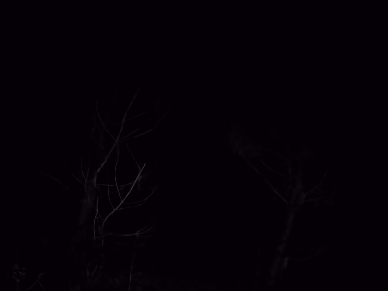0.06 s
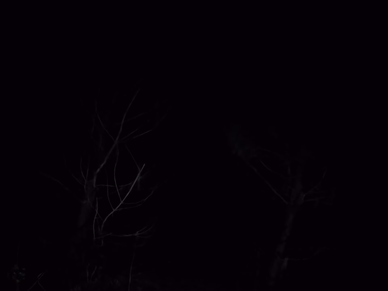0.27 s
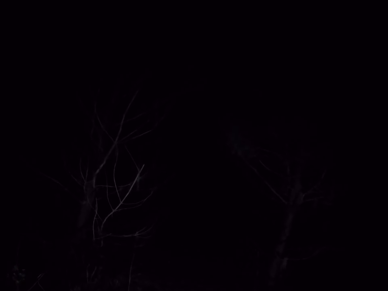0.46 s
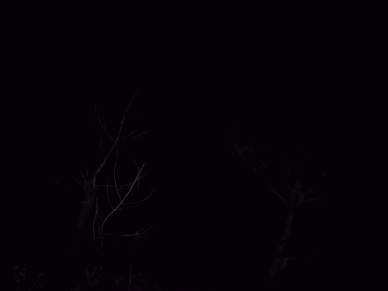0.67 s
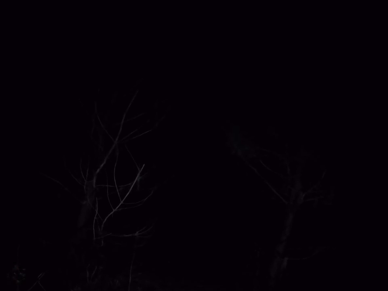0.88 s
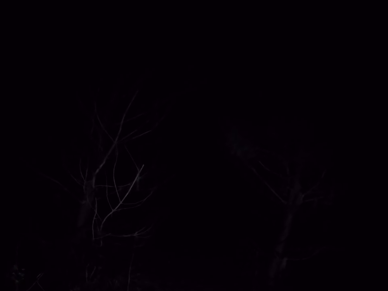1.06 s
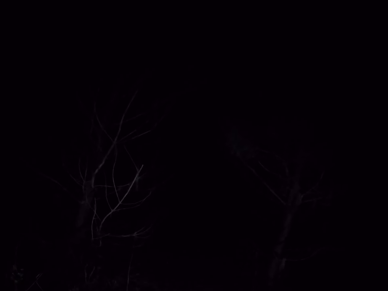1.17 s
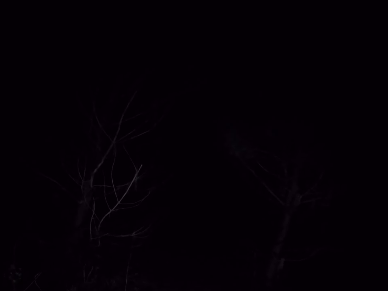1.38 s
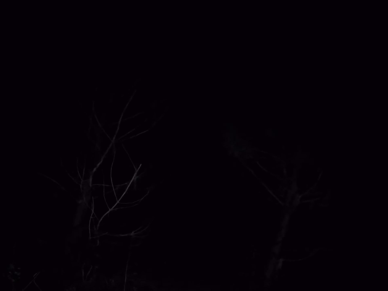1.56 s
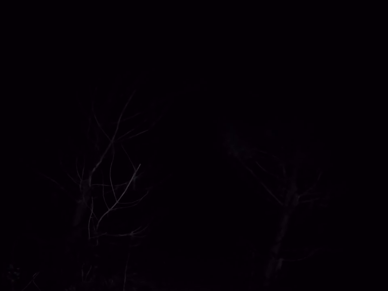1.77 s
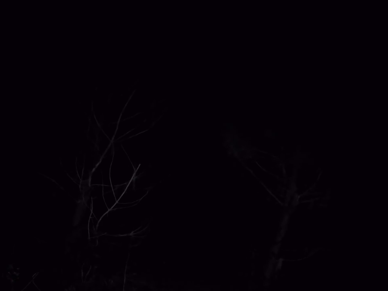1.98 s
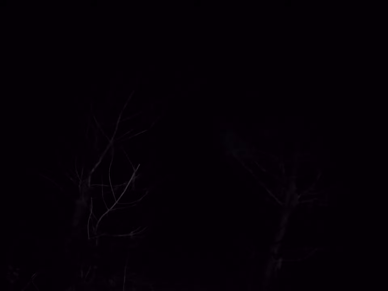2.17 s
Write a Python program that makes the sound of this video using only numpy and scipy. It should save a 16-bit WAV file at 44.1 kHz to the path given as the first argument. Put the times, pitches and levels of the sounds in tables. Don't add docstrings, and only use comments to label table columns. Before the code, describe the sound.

Hounds barking and baying in night woods, two hoarse chops answered by clear howls, crickets trilling

```python
import sys
import numpy as np
from scipy import signal
from scipy.fft import rfft, irfft, next_fast_len
from scipy.io import wavfile
from scipy.ndimage import uniform_filter1d, map_coordinates

SR = 44100
rng = np.random.default_rng(int(sys.argv[2]) if len(sys.argv) > 2 else 0)


def wrap_up_sound(samples):
    columns = np.atleast_2d(samples).T
    tamed = np.clip(columns, -1, 1)
    steps = np.round(tamed * 32767).astype(np.int16)
    wavfile.write(sys.argv[1], SR, steps)


def to_linear_factor(level_db):
    exponent = np.asarray(level_db, float) / 20
    return 10 ** exponent


N = 97020
T = np.arange(N) / SR

# time in seconds, pitch in Hz, level in dB,
# roughness from 0 to 1, strength of the odd multiples of the pitch from 0 (an octave up) to 1.
BARKS = [
    [(.206, 322, -70, 0.1, 1), (.22, 326.6, -46.5, 0, 1), (.236, 330.4, -36.5, 0.37, 1),
     (.248, 376.7, -38.5, 0.2, 0), (.272, 377.5, -39, 0.37, 0.54), (.285, 417.4, -38, 0.45, .25),
     (.305, 393.8, -41, 0.6, 1), (.315, 314.4, -37.5, 0.48, 0.9), (.39, 303, -63, .8, 0)],
    [(.919, 342, -50, .05, 1), (.934, 322, -49, 0.05, 1), (.942, 339, -40, 0.15, 0.9),
     (.962, 350, -36, 0.35, 0.7), (.978, 363, -37, 0.3, .3), (1, 364, -41, 0.35, 0.3),
     (1.014, 385, -41, 0.4, .3), (1.03, 325, -39, 0.3, 0.3), (1.045, 320, -52, .6, .3),
     (1.09, 300, -75, 0.7, 0.14)],
]
# time in seconds, pitch in Hz, level in dB, roughness from 0 to 1.
FAR_BARKS = [
    [(.466, 328, -58, 0.1), (.476, 330, -45, 0.09), (.53, 339.3, -49, 0.5), (.585, 335.4, -46, 0.5),
     (.615, 668, -42, 0.1), (.645, 655, -50, 0.15), (.665, 655, -43, 0.1), (.69, 648, -62, 0.1)],
    [(1.07, 368.3, -68, 0.41), (1.1, 373.3, -49, 0.4), (1.17, 354, -48, 0.5), (1.21, 618, -52, .12),
     (1.3, 604, -60, 0.3), (1.36, 600, -72, 0.3)],
]
# time in seconds, pitch in Hz, level in dB.
BAYS = [
    [(.462, 672, -63), (.484, 672, -45), (.522, 673, -34), (.534, 676, -44), (.556, 664, -43),
     (.572, 673, -31), (.6, 676, -44), (.626, 672, -37), (.642, 672, -50), (.664, 674, -54),
     (.678, 682, -47), (.695, 680, -62)],
    [(1.1, 630, -50), (1.114, 632, -41), (1.142, 700, -38), (1.155, 716, -45), (1.185, 727, -40),
     (1.23, 726, -41), (1.252, 727, -49), (1.264, 727, -39), (1.304, 726, -43), (1.322, 727, -54),
     (1.336, 727, -48), (1.39, 720, -55), (1.42, 718, -66), (1.46, 717, -60), (1.51, 724, -69),
     (1.69, 720, -70)],
    [(1.13, 652, -48), (1.155, 660, -48), (1.178, 671, -37), (1.2, 672, -44), (1.225, 668, -50),
     (1.27, 665, -47), (1.36, 660, -60)],
    [(.73, 690, -66), (.748, 692, -50), (.77, 690, -64), (.805, 690, -54), (.824, 688, -66),
     (.84, 687, -56), (.866, 686, -68), (.885, 685, -59), (.94, 682, -64)],
    [(.8, 632, -72), (.83, 628, -66), (.87, 622, -63), (.89, 620, -72)],
    [(.525, 700, -56), (.542, 706, -41), (.56, 708, -52), (.59, 712, -42), (.61, 705, -44), (.65, 700, -52),
     (.67, 700, -62)],
    [(.255, 800, -56), (.28, 838, -45), (.31, 835, -50), (.33, 830, -60)],
    [(.968, 815, -56), (.98, 832, -44), (1.015, 836, -44), (1.03, 830, -60)],
]
BAY_OVERTONES = [
    [0, -26],
    [0, -11, -24, -36],
    [0, -28],
    [0, -22],
    [-9, 0],
    [0, -22],
    [0, -6],
    [0, -14],
]
# frequency in Hz, level in dB.
THROAT = [(310, -64), (520, -17), (583, -5.5), (725, -6.5), (1080, -6.5), (1460, 2.5), (1910, -5),
          (2710, -7), (4200, -26.5), (5460, -52), (9240, -120)]
# frequency in Hz, level in dB.
FAR_THROAT = [(550, 1.5), (950, 2), (1360, 6.5), (1700, 8), (1980, -6), (2300, 2.5), (4200, -29)]
# frequency in Hz, level in dB.
CLOSED_MOUTH = [(600, -5), (980, 9), (1250, 0), (2000, -45), (5000, -88)]
# frequency in Hz, level in dB.
HALF_OPEN_MOUTHS = [
    [(600, -25), (980, -11), (1300, -12), (1640, -1.5), (2300, -14), (3100, -24), (5000, -65)],
    [(600, -30), (980, -20), (1400, -8), (1700, -7), (2250, 1), (3100, -12), (5000, -65)],
]
# time it opens in seconds, time it stands wide in seconds.
MOUTH_TIMES = [(.216, .238), (.937, .98)]
# frequency in Hz, time to die by 60 dB in seconds.
WOODS = [(500, 0.79), (1500, 0.49), (4000, 0.33)]
# start in seconds, length in seconds, level in dB.
NEAR_CHIRPS = [(-.01, 0.15, -54.5), (.27, 0.17, -59), (.54, 0.21, -54), (.885, 0.11, -55),
               (1.15, 0.14, -57), (1.415, 0.2, -56), (1.695, 0.22, -56.5), (1.995, 0.26, -58.5)]
# start in seconds, length in seconds, level in dB.
LOW_CHIRPS = [(.26, 0.14, -64), (.58, 0.14, -63), (.85, 0.17, -63), (1.18, .12, -65), (1.47, .13, -60),
              (1.77, 0.13, -57.5), (2.06, 0.2, -62)]
# pitch in Hz, strokes a second, share sounding, level in dB, first stroke in seconds.
TRILLS = [
    (3674, 54, 0.78, -65, .01),
    (2146, 100, 0.8, -69.5, 0.011),
    (7110, 53, 1, -70, 0.013),
]
# pitch in Hz, strokes a second, share sounding, level in dB, first stroke in seconds.
TICKS = [
    (7670, 7.15, .2, -80, 0),
    (7420, 7.15, .2, -81, .09),
]
# time in seconds, level in dB.
NEAREST_TRILL = [(0, -66), (.8, -66), (1.3, -64), (1.6, -60.5), (2.2, -60)]
# frequency in Hz, level in dB.
CHORUS = [(1800, -23), (2100, -8.5), (2900, -9), (3500, -3), (4000, -14), (5000, -11.5), (5700, -18),
          (6500, -2.5),
          (7200, -11.5), (8100, -24), (9000, -26.5)]
# frequency in Hz, level in dB.
FAR_RASP = [(10500, -40), (12300, 0)]
# time in seconds, level in dB, pitch in Hz.
BUMPS = [
    (.385, -56, 150),
    (.665, -57, 135),
    (.48, -66, 340),
    (1.23, -65, 310),
    (2.11, -62, 275),
]
# time in seconds, level in dB, half length in seconds.
KATYDID_RASPS = [
    (.33, -67, .008),
    (.368, -65, .02),
    (1.235, -67, .01),
    (1.28, -64.5, .024),
    (.05, -76, .06),
]
# frequency in Hz, level in dB.
KATYDID_COLOUR = [(6000, -71.5), (9500, -12), (10500, 0), (12500, -1), (14000, -13), (15200, -27)]
# frequency in Hz, level in dB.
LEAVES = [(200, -7.5), (400, -5), (1500, -6), (2500, -21), (5000, -90)]
# frequency in Hz, level in dB.
AIR = [(20, 1.5), (64, -1.5), (125, -9.5), (420, -17.5), (1900, -23.5), (3000, -64)]
# frequency in Hz, level in dB.
HISS = [(1500, -11.5), (3000, 10), (15300, -17.5)]


def bark(rows, throat, half_open=None, mouth_times=(0, 0)):
    (pitch, level_db, rough, *odd), sounding = controls(rows)
    rough = np.clip(rough, 0, .98)
    turn = 2 * np.pi * np.cumsum(pitch * (1 + .04 * rough * wobble(250))) / SR
    odd_share = np.clip(odd[0], 0, 1) if odd else 1
    pulses = 0
    for k in range(1, 14):
        blunting = .35 * k * k
        pulses = pulses + np.cos(k * turn + blunting) * (odd_share if k % 2 else 1)
    pulses = unit(pulses)
    breath = 2.4 * unit(rng.standard_normal(N) * (1 + np.cos(turn)))
    scatter = to_linear_factor(4 * rough * wobble(200))
    source = np.sqrt(1 - rough) * pulses * scatter + np.sqrt(rough) * breath
    source = source * to_linear_factor(level_db) * sounding

    def through(x, mouth):
        return filtered(x, lambda hz: to_linear_factor(along(mouth, hz)) / (1 + (560 / (hz + 1)) ** 12))

    if odd:
        opened, wide = [np.clip((T - s) / 0.0034 + .5, 0, 1) for s in mouth_times]
        voice = through(source * (1 - opened), CLOSED_MOUTH)
        voice = voice + through(source * (opened - wide), half_open) + through(source * wide, throat)
    else:
        voice = through(source * 0.694, throat)
    shut = np.clip((T - rows[0][0] - 0.089) / 0.099 + .5, 0, 1)
    muffled = filtered(voice * shut, lambda hz: 1 / (1 + (hz / 2100) ** 4))
    voice = voice * (1 - shut) + muffled
    return woods(voice / np.std(through(pulses, throat)), level_db=1, linger=1)


def bay(rows, overtones):
    (pitch, level_db), sounding = controls(rows)
    turn = 2 * np.pi * np.cumsum(pitch * (1 + .008 * wobble(59.62))) / SR
    tone = 0
    for k, db in enumerate(overtones):
        flutter_db = 2.8 * wobble(39.1) * (k > 0)
        tone = tone + to_linear_factor(db + flutter_db) * np.sin((k + 1) * turn)
    howl = np.sqrt(2) * tone * to_linear_factor(level_db + 1.3 * wobble(69.4)) * sounding
    return woods(howl, level_db=-12, linger=1.3)


def woods(x, level_db, linger):
    hz, t, z = signal.stft(rng.standard_normal(SR), SR, nperseg=256)
    dying = to_linear_factor(-60 * t / linger / along(WOODS, hz)[:, None])
    build_up = 1 - np.exp(-t / 0.0022)
    tail = signal.istft(z * dying * build_up, SR, nperseg=256)[1]
    return x + to_linear_factor(level_db) * signal.fftconvolve(x, tail / np.linalg.norm(tail))[:N]


def insects():
    near = chirps(NEAR_CHIRPS, 6595, 33) + chirps(LOW_CHIRPS, 6230, 32.5)
    steady = sum(to_linear_factor(db) * wing(hz, rate, share, s, blur_hz=58.3) for hz, rate, share, db, s in TRILLS)
    nearest_db = np.interp(T, *np.transpose(NEAREST_TRILL)) + 0.5 * wobble(7.5)
    nearest = to_linear_factor(nearest_db) * wing(3365, 44.2, share=.42, start=-.001, blur_hz=25)
    ticks = 0
    for hz, rate, share, db, s in TICKS:
        ticks = ticks + to_linear_factor(db + 3.5 * wobble(4.5)) * wing(hz, rate, share, s, blur_hz=30)
    chorus = to_linear_factor(-56.5) * noise(CHORUS, patchy_db=1.5)
    rasp = to_linear_factor(-76) * from_on(1.99) * noise(FAR_RASP, patchy_db=2)
    return near + steady + nearest + ticks + chorus + rasp


def chirps(rows, hz, rate):
    out = np.zeros(N)
    for start, length, db in rows:
        u = (T - start) / length
        fade_db = -6 * np.clip(u, 0, 1) ** 3
        edges = np.clip(np.minimum(u, 1 - u) * 30, 0, 1)
        out += to_linear_factor(db + fade_db) * edges * wing(hz, rate, 0.88, start, blur_hz=30)
    return out


def wing(hz, rate, share, start, blur_hz):
    cycle = np.clip(((T - start) * rate) % 1 / np.clip(share, .05, 1), 0, 1)
    pitch = hz * (1 - .008 * (cycle - .5)) + blur_hz * wobble(150)
    stroke = np.sin(np.pi * cycle) ** 0.6 * to_linear_factor(1.3 * wobble(rate))
    return unit(stroke * np.sin(2 * np.pi * np.cumsum(pitch) / SR))


def bumps_and_rasps():
    bumps, rasps = np.zeros(N), np.zeros(N)
    for s, db, hz in BUMPS:
        turn = 2 * np.pi * hz * (T - s)
        thump = np.sin(turn)
        if hz < 250:
            thump = thump + 0.89 * np.sin(1.44 * turn) + 0.86 * np.sin(1.97 * turn)
        bumps += to_linear_factor(db) * np.exp(-((T - s) / .017) ** 2) * thump
    for s, db, half in KATYDID_RASPS:
        rasps += to_linear_factor(db) * np.exp(-((T - s) / half) ** 2)
    return bumps + noise(KATYDID_COLOUR, patchy_db=6) * rasps


def leaves():
    return to_linear_factor(-64 + 4.1 * wobble(7.13)) * from_on(1.75) * noise(LEAVES, patchy_db=-1.5)


def air():
    return to_linear_factor(-56.5) * noise(AIR, patchy_db=1.82) + to_linear_factor(-66.5) * noise(HISS, patchy_db=4.5)


def noise(spectrum, patchy_db):
    z = signal.stft(rng.standard_normal(N), nperseg=512)[2]
    patches = uniform_filter1d(rng.standard_normal(z.shape), 6, 0)
    patches = unit(uniform_filter1d(patches, 10, 1))
    x = signal.istft(z * to_linear_factor(patchy_db * patches), nperseg=512)[1][:N]
    return unit(filtered(x, lambda hz: to_linear_factor(along(spectrum, hz))))


def controls(rows):
    s, *columns = np.transpose(rows)
    gate = np.clip(np.minimum(T - s[0], s[-1] - T) / 0.007, 0, 1)
    return [np.interp(T, s, c) for c in columns], gate


def from_on(start):
    return np.clip((T - start) / 0.13, 0, 1)


def wobble(rate):
    return map_coordinates(rng.standard_normal(int(N * rate / SR) + 4), [T * rate])


def filtered(x, response):
    m = next_fast_len(N + SR // 2)
    return irfft(rfft(x, m) * response(np.fft.rfftfreq(m, 1 / SR)), m)[:N]


def along(points, hz):
    f, v = np.transpose(points)
    return np.interp(np.log(hz + 1), np.log(f + 1), v)


def unit(x):
    return x / np.sqrt(np.mean(x ** 2) + 1e-20)


def scene():
    dogs = sum(bark(rows, THROAT, mouth, times) for rows, mouth, times in zip(BARKS, HALF_OPEN_MOUTHS, MOUTH_TIMES))
    dogs = dogs + sum(bark(rows, FAR_THROAT) for rows in FAR_BARKS)
    dogs = dogs + sum(bay(rows, overtones) for rows, overtones in zip(BAYS, BAY_OVERTONES))
    return (dogs + insects() + bumps_and_rasps() + leaves() + air())[None]


def band_limit(x):
    return signal.sosfilt(signal.butter(12, 15790, fs=SR, output="sos"), x)


def record(dry):
    mix = filtered(dry[0], lambda hz: hz < 15330)[None]
    return band_limit(mix)


dry = scene()
out = record(dry)
wrap_up_sound(out)
```